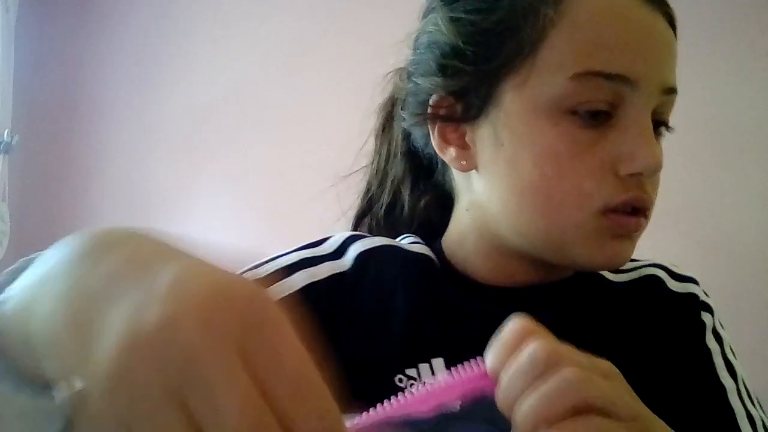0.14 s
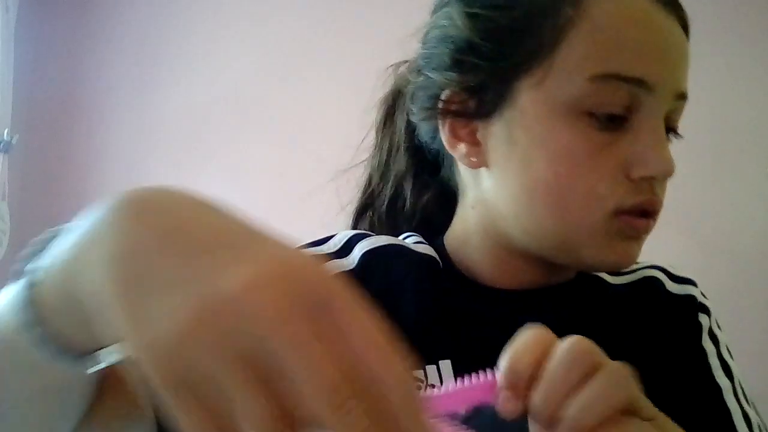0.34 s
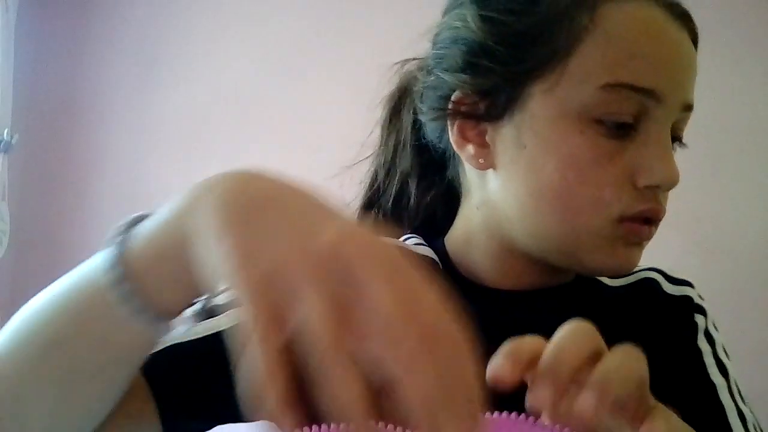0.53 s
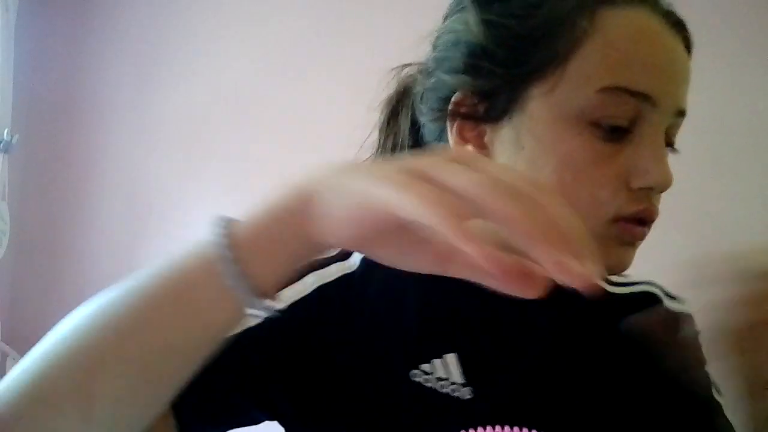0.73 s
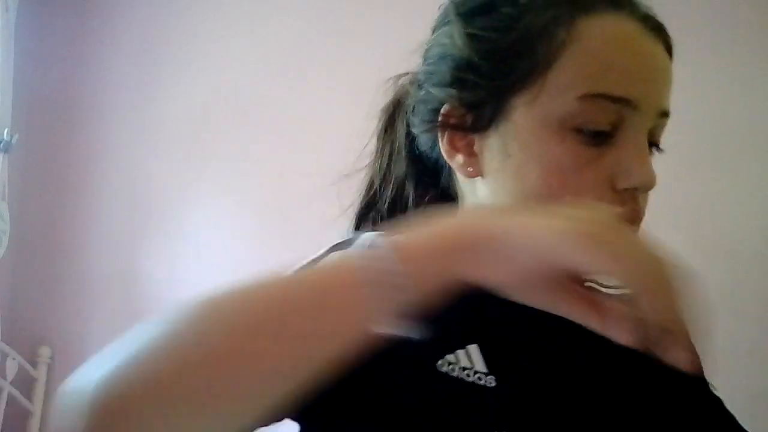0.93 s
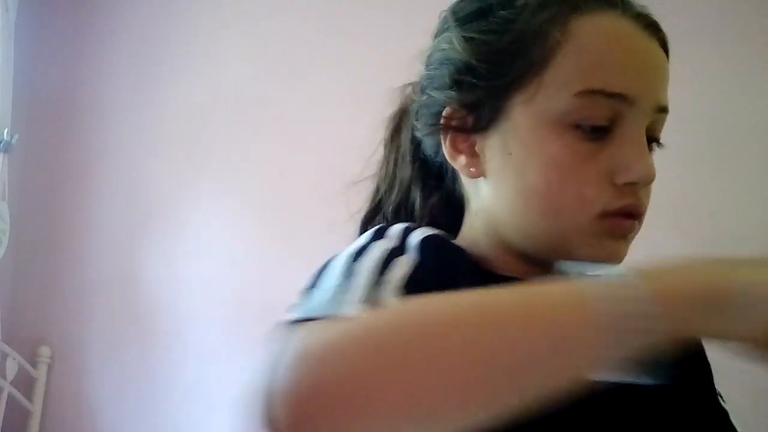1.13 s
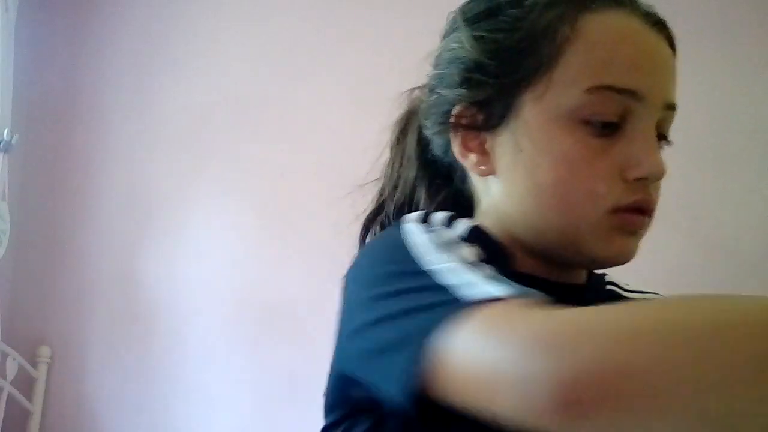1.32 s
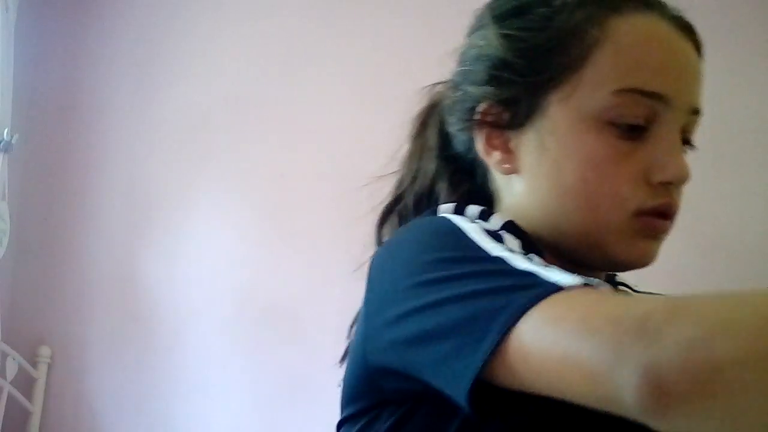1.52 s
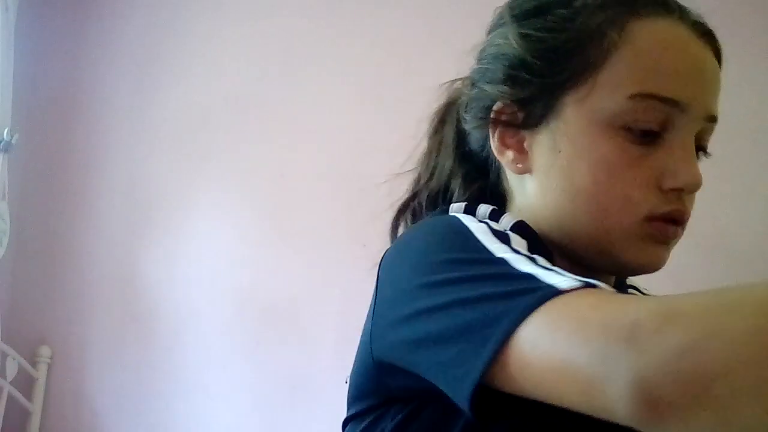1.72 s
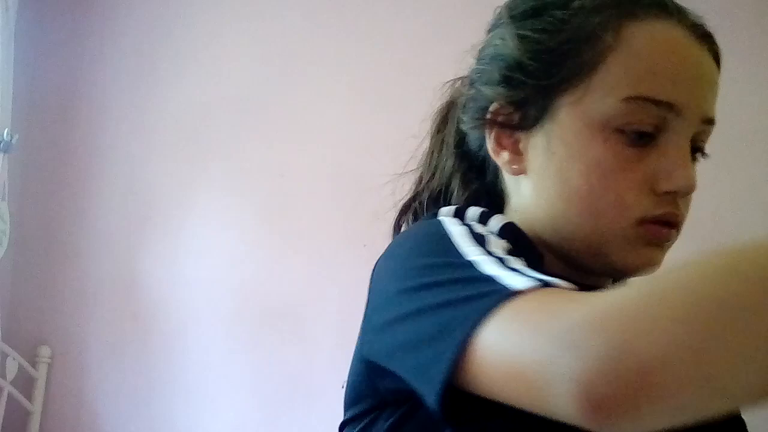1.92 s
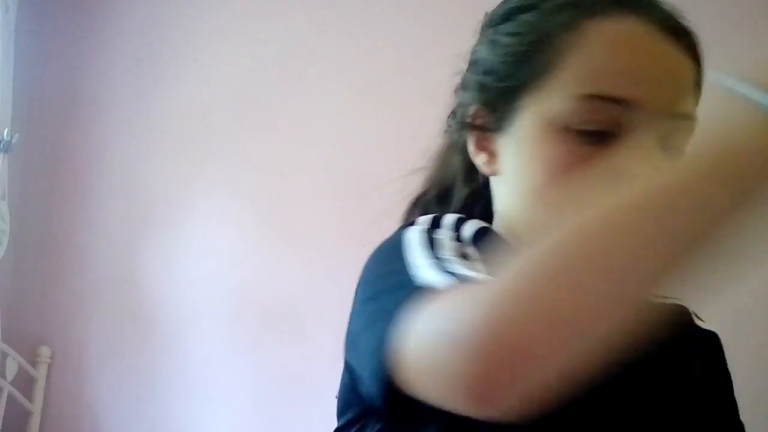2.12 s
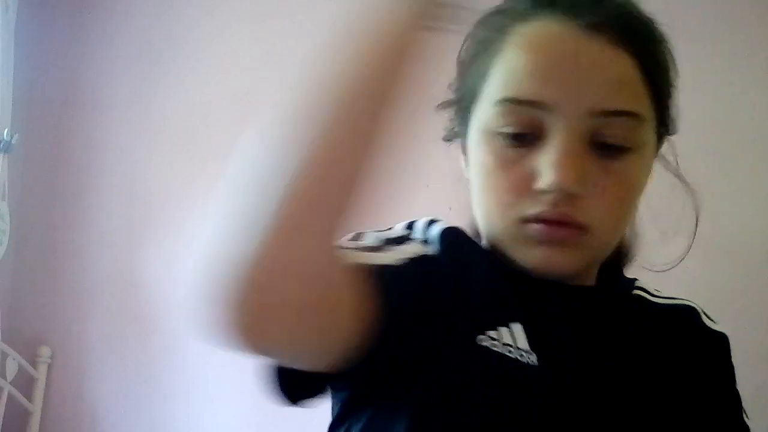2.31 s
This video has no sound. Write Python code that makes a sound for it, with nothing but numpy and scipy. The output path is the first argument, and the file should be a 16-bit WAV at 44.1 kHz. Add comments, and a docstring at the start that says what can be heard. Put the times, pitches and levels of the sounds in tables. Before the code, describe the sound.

A pencil case thumps hard on a table, pens clattering, then a hand rummages among them

```python
"""A pencil case thumps hard on a table, pens shift and click in it, and after a pause a hand rummages among them.
Thumps, bumps, clicks and landing pens are short struck tones, the clicks and landings with bursts of noise.
Rattling, rubbing and scuffing are showers of tiny random taps; the table rumbles under the moving arm.
The walls of a bare room add a short tail, and a small microphone close by colours and clips the sound."""
import sys
import numpy as np
from scipy import signal
from scipy.fft import rfft, irfft
from scipy.io import wavfile

SR = 44100
rng = np.random.default_rng(int(sys.argv[2]) if len(sys.argv) > 2 else 0)


def to_wav(sig):
    """Store sig (one row per channel, or 1-D mono) as 16-bit WAV at the path in sys.argv[1].

    Samples outside -1..1 are clipped; the rate is SR.
    """
    pcm = np.clip(np.atleast_2d(sig), -1, 1) * 32767
    pcm = np.round(pcm).astype(np.int16)
    wavfile.write(sys.argv[1], SR, pcm.T)  # frames by channels


N = 103635  # length in samples

# ways a plastic pen barrel rings: (multiple of its ring pitch, level [dB], time to fall 60 dB [s])
BARREL_MODES = [(.56,-8.5,0.032),(1,-0.5,0.024),(1.08,-7.5,0.013),(1.55,-11.5,.012)]
# colour of the clack of a pen: (frequency [Hz], relative level [dB])
CLACK_COLOUR = [(500,-27),(1000,1),(1500,4.5),(1750,-2.5),(2200,-1),(3300,1),(4200,-6.5),(7000,-22),(15000,-72)]
CLICK_T60_S = 0.025  # the noise of a contact falls 60 dB in this time


def undb(db):
    """Turn decibels into a gain."""
    return 10 ** (np.asarray(db) / 20)


def unit(x):
    """Scale to an average (rms) level of 1."""
    return x / np.sqrt(np.mean(x ** 2) + 1e-20)


def curve(rows):
    """Draw a gain over time through (time [s], level [dB]) points."""
    s, db = np.array(rows).T
    return undb(np.interp(np.arange(N) / SR, s, db))


def colour(x, points):
    """Filter through (frequency [Hz], level [dB]) points; white noise keeps its overall level."""
    hz, db = np.array(points).T
    size = 4096
    log_hz = np.log(np.fft.rfftfreq(size, 1 / SR) + 1)
    gain = unit(undb(np.interp(log_hz, np.log(hz), db)))
    # folding the cepstrum makes the filter respond at once, with nothing ahead of the sound
    cepstrum = irfft(np.log(gain))
    cepstrum[1:size // 2] *= 2
    cepstrum[size // 2 + 1:] = 0
    response = irfft(np.exp(rfft(cepstrum)))
    return signal.fftconvolve(x, response)[:len(x)]


def fade(t, t60):
    """Die away smoothly, by 60 dB in t60 seconds."""
    return np.exp(-np.log(1000) * t / max(t60, 1e-3))


def ring(modes, t, stretch=1):
    """Ring a struck object: fading sine tones that start in alternating directions."""
    out = 0
    for k, (hz, db, t60) in enumerate(modes):
        tone = np.sin(2 * np.pi * hz * stretch * t)
        out = out + (-1) ** k * undb(db) * fade(t, t60) * tone
    return out


def add(out, s, x):
    """Mix x in at time s."""
    i = max(int(s * SR), 0)
    out[i:i + len(x)] += x[:max(N - i, 0)]


def grains(per_s, scatter_db):
    """Make random tiny taps, as in stick-slip, a few much stronger than the rest."""
    happens = rng.random(N) < per_s / SR
    sign = rng.choice([-1, 1], N)
    size = np.minimum(rng.exponential(size=N), 4)
    return unit(happens * sign * undb(scatter_db * size))


def soften(x):
    """Dull the very top, which a contact of soft plastic lasts too long to excite."""
    contact_hz = 9085
    return signal.sosfilt(signal.butter(4, contact_hz, fs=SR, output="sos"), x)


def blow():
    """The case hits the table top and sets its modes ringing."""
    # thumps, one hard and the others light: (time [s], level [dB])
    blows = [(0.1975,-5),(0.244,-28.5),(1.769,-38.5),(1.935,-29.5)]
    # ways the table rings: (frequency [Hz], level [dB], time to fall 60 dB [s])
    table_modes = [(130,-16,.2),(197.2,-1.5,0.048),(225.8,-7.5,.23),(309.2,-10.5,0.18),(456,2,0.013),(503.7,-7,0.12),(615,-5,0.088),(709,-6,0.099),(853,0.5,0.0094)]
    out = np.zeros(N)
    table = ring(table_modes, np.arange(SR // 2) / SR)
    for s, db in blows:
        add(out, s, undb(db) * table)
    return out


def bumps():
    """Pens and case bump dully: a few cycles of the heavily damped case wall."""
    # soft contacts: (time [s], relative level [dB], pitch [Hz])
    soft_contacts = [(.029,-21.5,610),(.125,-20,470),(.185,-17,540),(.281,-21,466),(.319,-15.5,644),(.338,-18,316),(.366,-21.5,905),(.444,-23,267),(.767,-30,650),(.8435,-34,558.8),(1.561,-16.5,423),(1.564,-21,746),(1.887,-16,817)]
    t60_s, rise_s = 0.017, 0.0015
    t, out = np.arange(SR // 10) / SR, np.zeros(N)
    rise = 1 - np.exp(-t / rise_s)
    for s, db, hz in soft_contacts:
        add(out, s, 1.55 * rise * ring([(hz, db, t60_s)], t))
    return out


def clicks():
    """Each contact of two pens snaps and chatters as knock, clack and tick, and rings one barrel at its pitch."""
    # pens striking each other, levels relative within each column:
    # (time [s], hollow knock [dB], barrel clack [dB], tip tick [dB], ring pitch [Hz], ring [dB])
    strikes = [(0.030,-35.5,-42,-66,2100,-35),(0.135,-46,-66,-54,4980,-48),(0.197,-5,-22,-28,2288,-14.5),(0.236,-13,-50,-26,6380,-31.5),(0.2419,-29,-19,-34.5,3690,-29),(0.262,-25,-47,-56,970,-20),(0.292,-22.5,-50,-59,2750,-33.5),(0.308,-40,-26,-32.5,3730,-28),(0.321,-46,-29,-46,2770,-31),(0.3553,-39,-34,-48,2030,-33),(0.4087,-40,-45,-55,1130,-31),(0.4501,-38,-45,-63,1580,-42),(0.711,-31,-42,-54,3600,-43),(0.733,-38,-45,-65.5,3500,-48),(0.757,-59,-48,-64,3560,-54),(1.5019,-35,-37,-36.5,2875,-30),(1.561,-40.5,-30.5,-43,6530,-37.5),(1.596,-26,-30,-41,5780,-33),(1.687,-37,-44.5,-71,2670,-47),(1.700,-44,-39.5,-57,4150,-43),(1.768,-32.5,-34,-40,6570,-41),(1.779,-37.5,-26,-30.5,6000,-34.5),(1.785,-41,-27.5,-38,5900,-26.5),(1.812,-48,-33,-36,2880,-29),(1.840,-63,-28.5,-46,2900,-35),(1.850,-60,-31,-41.5,3510,-30),(1.904,-45,-50,-48,4710,-34),(1.912,-48,-30.5,-36,5120,-34),(1.9185,-24,-35,-39,5010,-29),(1.930,-24,-25.5,-33.5,4800,-35),(1.935,-26,-35,-38,2600,-27.5),(1.945,-30.5,-30,-45,3280,-33),(1.952,-45,-39,-44,3390,-30),(1.9703,-47,-29,-38,2780,-27.5),(1.976,-29,-28,-46,2710,-29.5),(1.989,-30.5,-44,-48,3240,-31.5),(1.998,-37.5,-35,-39.5,3480,-36),(2.040,-46,-42,-55,1300,-37),(2.0534,-59,-46,-50,3410,-34.5),(2.109,-42,-43,-64,2780,-42.5),(2.131,-42,-37,-56,2200,-42),(2.1666,-43,-34.5,-55,2860,-43),(2.175,-34,-38,-47,4420,-36.5),(2.22,-52,-37,-43.5,4600,-38),(2.247,-34,-39,-43.5,1300,-28)]
    # colours of knock and tick: (frequency [Hz], relative level [dB])
    knock_colour = [(30,-24),(100,-10),(220,-0.5),(450,-6.5),(800,-1),(1200,-12),(2000,-20.5),(5000,-55.5),(15000,-88.5)]
    tick_colour = [(2000,-29),(4400,1),(6600,2.5),(7900,-11),(10200,-10),(16000,-45.5)]
    snap_db, ring_gain_db = 7, -1
    t = np.arange(SR // 6) / SR
    knock, clack, tick, barrels = np.zeros((4, N))
    for s, knock_db, clack_db, tick_db, hz, ring_db in strikes:
        for part, db in ((knock, knock_db), (clack, clack_db), (tick, tick_db)):
            burst = rng.standard_normal(len(t)) * fade(t, CLICK_T60_S)
            burst[SR // 2000] += undb(snap_db)  # one sharp snap half a millisecond in
            add(part, s, undb(db) * burst)
        add(barrels, s, undb(ring_db + ring_gain_db) * ring(BARREL_MODES, t, hz))
    knock = undb(1.5) * colour(knock, knock_colour)
    clack = colour(clack, CLACK_COLOUR)
    tick = undb(1) * colour(tick, tick_colour)
    return knock + clack + tick + soften(barrels)


def landing():
    """A loose pen lands on the table and rings freely at each bounce, with a little chatter."""
    # bounces: (time [s], level [dB])
    bounces = [(0.6697,-23),(0.678,-24)]
    # ways the loose pen rings: (frequency [Hz], level [dB], time to fall 60 dB [s])
    loose_modes = [(876,-0.5,0.013),(1022,-10.5,0.11),(2046,-6.5,0.017),(2752,-7.5,0.014),(7047,-21.5,0.017)]
    chatter_db = -9
    t, out = np.arange(SR // 6) / SR, np.zeros(N)
    for s, db in bounces:
        chatter = colour(rng.standard_normal(len(t)) * fade(t, CLICK_T60_S), CLACK_COLOUR)
        add(out, s, undb(db) * (ring(loose_modes, t) + undb(chatter_db) * chatter))
    return soften(out)


def rattle(count=6):
    """As they settle, pens of different lengths touch lightly at random, each with its own barrel ring."""
    # strength of the light touches: (time [s], level [dB])
    strength = [(0,-51.5),(.18,-48.5),(.26,-41),(.5,-50),(.63,-74.5),(1.72,-77.5),(1.79,-43.5),(1.95,-43),(2.35,-82)]
    touches_per_s, scatter_db = 45, 3.5  # for each pen
    low_hz, high_hz = 952, 3497  # ring pitch of the longest and the shortest pen
    tilt_db = -8.5  # level of the shortest pen against the longest
    t, out = np.arange(SR // 20) / SR, np.zeros(N)
    for share in np.linspace(0, 1, count):
        pitch_hz = low_hz * (high_hz / low_hz) ** share
        barrel = unit(ring(BARREL_MODES, t, pitch_hz)) / np.sqrt(len(t) * count)
        touches = grains(touches_per_s, scatter_db) * curve(strength)
        out += undb(tilt_db * share) * signal.fftconvolve(touches, barrel)[:N]
    return soften(out)


def rub():
    """Pens scrape on each other in the case: a dense shower of tiny slips."""
    # strength of the scraping: (time [s], relative level [dB])
    strength = [(0,-38.5),(.05,-56),(.18,-56.5),(.25,-38.5),(.33,-49),(.55,-60.5),(.62,-81),(1.47,-85),(1.497,-41),(1.55,-46.5),(1.66,-62),(1.745,-67),(1.785,-38.5),(1.83,-50.5),(1.94,-39),(2,-51),(2.07,-76),(2.15,-59),(2.25,-46.5),(2.3,-71)]
    # colour of the scraping: (frequency [Hz], relative level [dB])
    scrape_colour = [(30,-28.5),(100,-10.5),(220,5.5),(400,-2.5),(900,-2.5),(1400,4),(1750,-2),(2300,0),(3300,-3),(3900,-4),(6500,-8.5),(8000,-13.5),(10200,-21),(12000,-29),(15500,-47.5)]
    slips = grains(per_s=1100, scatter_db=1.5) * curve(strength)
    return undb(0.5) * colour(slips, scrape_colour)


def drag():
    """The case scuffs the table as it shifts under the hands: fewer, lower slips."""
    # strength of the scuffing: (time [s], relative level [dB])
    strength = [(0,-55.5),(.1,-39),(.19,-37),(.25,-21),(.3,-44),(.4,-34.5),(.56,-44.5),(.61,-54),(.8,-53),(1.1,-76.5),(1.4,-80.5),(1.5,-49),(1.74,-62.5),(1.78,-31),(1.86,-42),(1.94,-32),(2.12,-64.5),(2.24,-39.5),(2.35,-74)]
    # colour of the scuffing: (frequency [Hz], relative level [dB])
    scuff_colour = [(40,-29.5),(100,-4.5),(160,-2),(228,6),(290,-1.5),(450,-0.5),(650,-3.5),(900,-8.5),(1300,-12.5),(2500,-41),(6000,-68)]
    slips = grains(per_s=470, scatter_db=1) * curve(strength)
    return undb(-1) * colour(slips, scuff_colour)


def rumble():
    """A low table resonance swells with each shift of the arm, amid dull handling noise."""
    # swells as the arm leans and shifts: (time of the peak [s], half length [s], level [dB])
    swells = [(0.24,0.023,-34.5),(0.53,0.047,-48.5),(0.861,0.09,-48),(1.235,0.11,-47),(1.495,0.086,-41),(1.642,0.14,-49),(1.82,0.083,-38.5),(2.04,0.033,-39.5),(2.155,0.11,-36.5),(2.344,0.031,-53)]
    # colour of the handling noise: (frequency [Hz], relative level [dB])
    noise_colour = [(20,-21.5),(45,-5.5),(60,8),(80,-11.5),(130,0.5),(160,-11.5),(230,-14.5),(400,-24),(1200,-69)]
    centre_hz, rest_db = 58.55, -63.5  # the pitch drifts around the centre
    t = np.arange(N) / SR
    swell = undb(rest_db)
    for s, half, db in swells:
        swell = swell + undb(db) * np.cos(np.pi / 2 * np.clip((t - s) / half, -1, 1))
    drift = unit(colour(rng.standard_normal(N), [(5, 0), (15, -20), (60, -80)]))
    pitch_hz = centre_hz * (1 + 0.045 * drift)
    tone = np.sqrt(2) * np.sin(2 * np.pi * np.cumsum(pitch_hz) / SR)
    noise = unit(colour(rng.standard_normal(N), noise_colour))
    return swell * (undb(-4.5) * tone + undb(-4.5) * noise)


def background():
    """A faint steady noise, strongest in the bass, lies under everything."""
    # colour of the noise: (frequency [Hz], relative level [dB])
    noise_colour = [(30,-16),(64,-4.5),(130,-8.5),(266,-24),(460,-24.5),(1350,-32.5),(2300,-32.5),(5900,-33),(7200,-39),(8000,-50),(11000,-50),(16000,-60)]
    return undb(-62.5) * unit(colour(rng.standard_normal(N), noise_colour))


def room(x, wet_db):
    """Add early reflections from the table and near walls, and a diffuse tail that fades at its own rate per band."""
    # bands of the tail: (centre [Hz], time to fall 60 dB [s], level [dB])
    bands = [(100.7,0.77,-10.5),(250,0.23,-7.5),(600,0.42,-7.5),(1490,0.37,-10),(3500,0.75,-14.5),(6470,0.43,-8.5),(11000,.3,-15)]
    gap_s, early_t60_s, early_db = 0.0044, 0.12, -8
    t = np.arange(SR) / SR
    log_hz = np.log(np.fft.rfftfreq(SR, 1 / SR) + 1)
    centres = np.log([row[0] for row in bands])
    noise = rfft(rng.standard_normal(SR))
    arrived = t > gap_s
    early = rng.standard_normal(SR) * fade(t, early_t60_s) * arrived
    response = undb(early_db) * unit(early)
    # each row of the identity matrix picks out one band, blending into its neighbours
    for share, (_, t60, db) in zip(np.eye(len(bands)), bands):
        band_noise = irfft(noise * np.interp(log_hz, centres, share))
        response = response + undb(db) * band_noise * unit(fade(t, t60) * arrived)
    echo = signal.fftconvolve(x, response / np.sqrt(SR))[:N]
    return x + undb(wet_db) * echo


def scene():
    """Mix the sources; each group reaches the walls from its own place, so it gets its own echoes."""
    thumps = room(soften(blow()), wet_db=-3.5)
    dull_bumps = room(soften(bumps()), wet_db=-1)
    pens = room(clicks() + landing(), wet_db=0)
    rummaging = room(rub() + drag() + rattle(), wet_db=0)
    return (thumps + dull_bumps + pens + rummaging + rumble() + background())[None]


def record(dry):
    """The microphone colours the sound and clips peaks that are too loud; the top is cut."""
    # colour of the small microphone: (frequency [Hz], relative level [dB])
    mic_colour = [(15,-18.5),(50,0),(13000,0),(16000,-11.5)]
    clip_level, top_hz = 0.71, 15900
    heard = undb(-2.5) * colour(dry[0], mic_colour)[None]
    clipped = np.clip(heard, -clip_level, clip_level)
    return signal.sosfilt(signal.ellip(8, .2, 70, top_hz, fs=SR, output="sos"), clipped)


dry = scene()
out = record(dry)
to_wav(out)
```